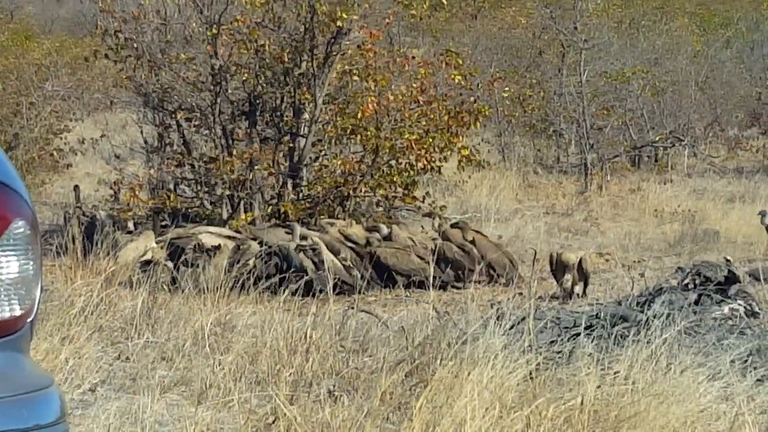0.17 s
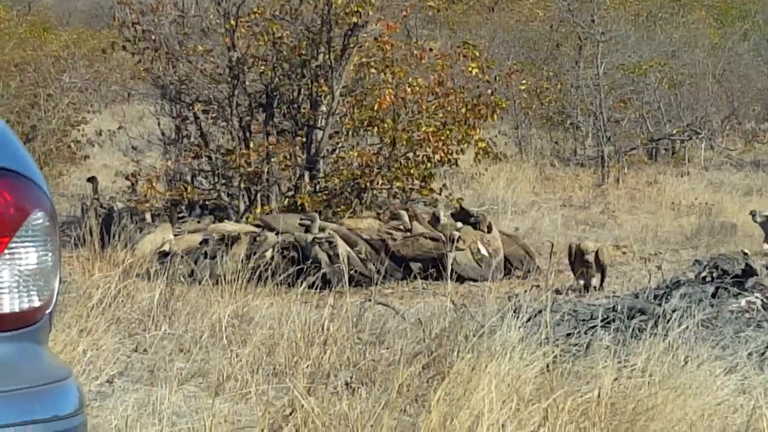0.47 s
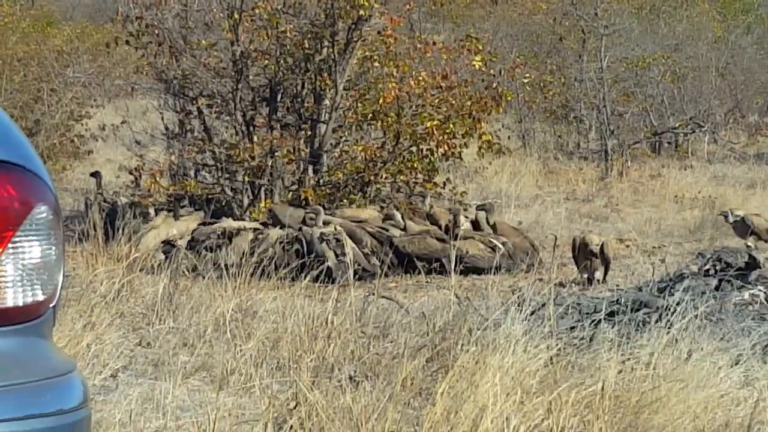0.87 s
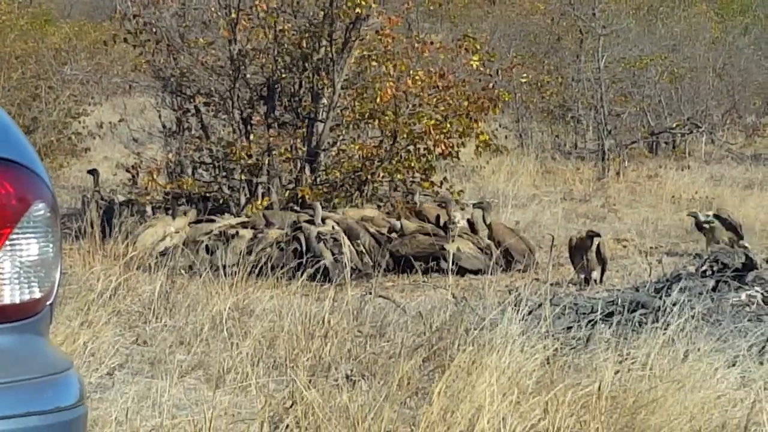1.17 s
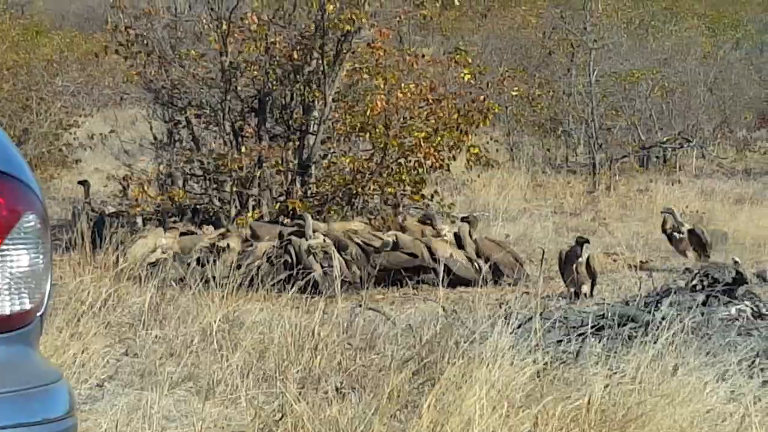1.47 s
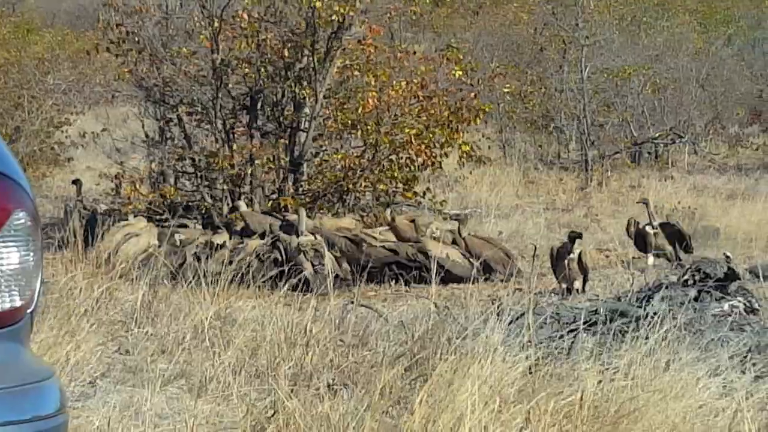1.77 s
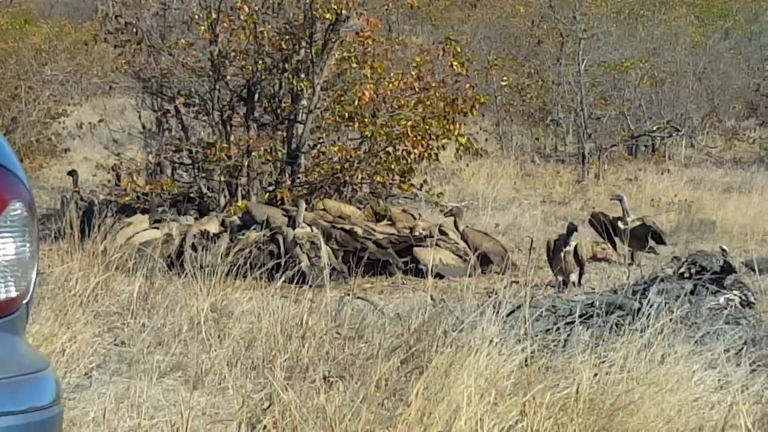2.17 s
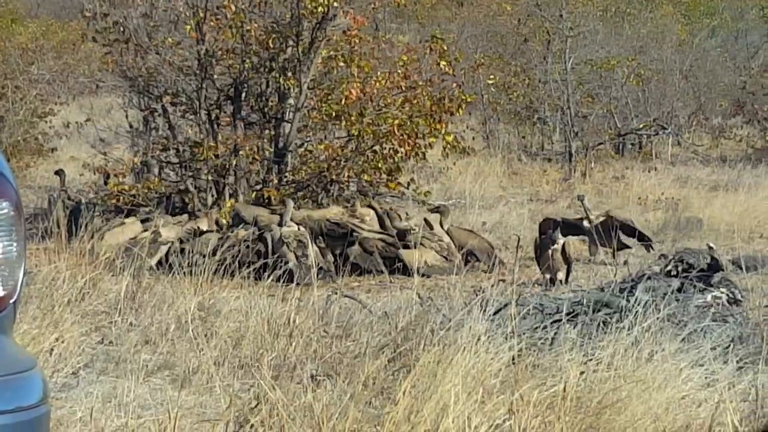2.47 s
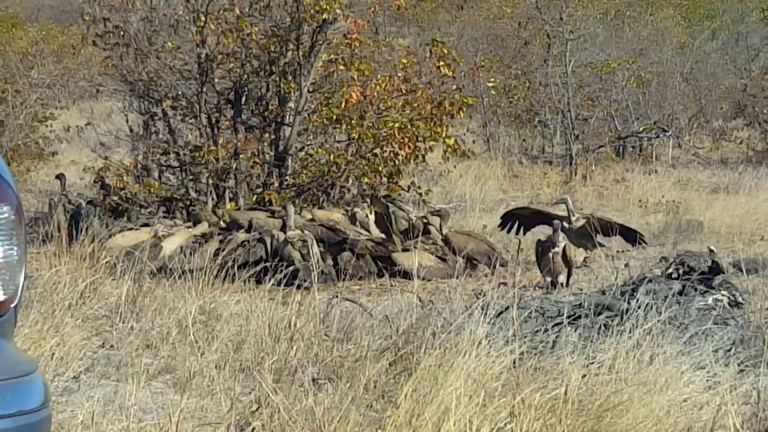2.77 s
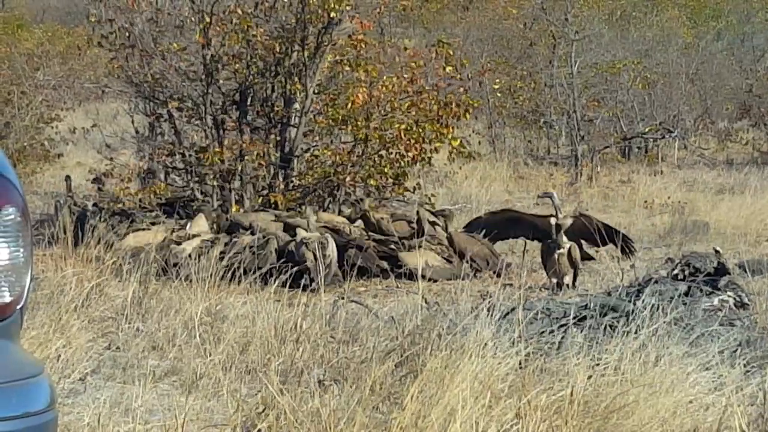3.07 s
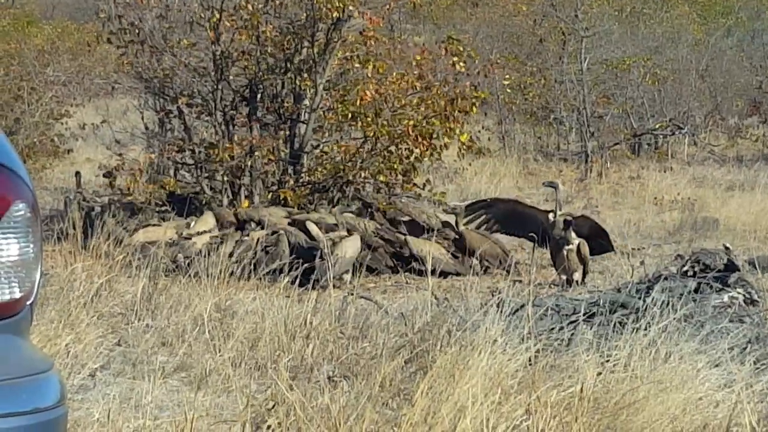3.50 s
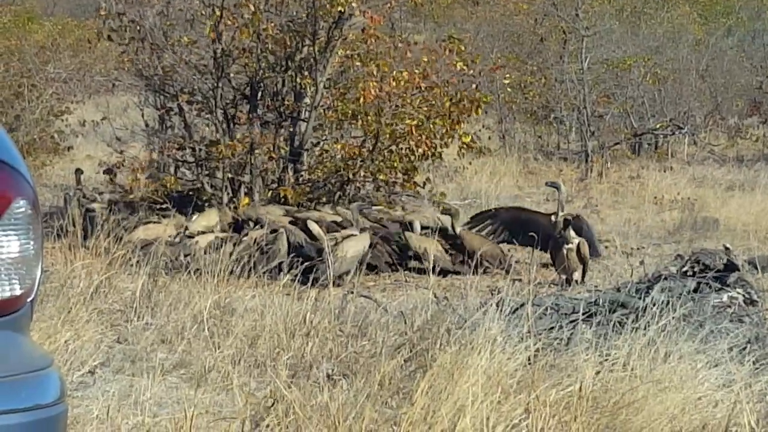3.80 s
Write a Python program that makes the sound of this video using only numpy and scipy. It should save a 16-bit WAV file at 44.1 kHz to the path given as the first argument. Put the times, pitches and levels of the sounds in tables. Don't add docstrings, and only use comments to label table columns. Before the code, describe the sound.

Vultures hiss, rasp and squabble over a carcass while low wind rumble buffets the microphone.

```python
import sys
import numpy as np
from scipy import signal
from scipy.fft import rfft, irfft, next_fast_len
from scipy.io import wavfile

SR = 44100
rng = np.random.default_rng(int(sys.argv[2]) if len(sys.argv) > 2 else 0)


def nominal_scale(level):
    x = np.asarray(level, float) / 20
    return 10 ** x


def to_wav(s):
    ch = np.atleast_2d(s).T
    pcm = np.round(np.clip(ch, -1, 1) * 32767)
    wavfile.write(sys.argv[1], SR, pcm.astype(np.int16))


N = 173754
TIME = np.arange(N) / SR
LONG = next_fast_len(N)

# pitch_hz, level_db
BREATH_COLOUR = [(2000, -3.5), (3000, -3.5), (4100, 0), (5200, -6.5), (6500, -14.5), (8000, -25),
                 (10000, -40), (14000, -26)]
# start_s, length_s, level_db
HISSER_THROAT = [(3570, 110, -3), (3760, 120, -7), (3910, 40, -2), (5850, 230, -3.5)]
HISSER_CALLS = [
    (.02, 0.21, -58.5),
    (.12, 0.31, -48),
    (.27, 0.33, -53),
]
RASPER_THROAT = [(2450, 260, -7), (3020, 100, -6), (4170, 110, -1), (4620, 200, -1), (5150, 220, -4),
                 (6050, 200, -19), (6650, 160, -18)]
RASPER_CALLS = [
    (0.543, 0.049, -48),
    (.59, 0.072, -57),
    (0.627, 0.14, -45),
    (0.709, 0.13, -45),
    (0.809, 0.078, -44),
    (0.871, 0.094, -44),
    (.94, 0.13, -48),
    (1.04, .13, -54.5),
]
SQUABBLER_THROAT = [(3050, 120, -6), (4050, 80, -1), (4840, 150, -2), (5750, 110, -8)]
SQUABBLER_CALLS = [
    (2.38, 0.091, -59.5),
    (2.47, 0.21, -60.5),
    (2.58, 0.23, -57),
    (2.76, 0.19, -55.5),
    (3.0, 0.15, -61.5),
    (3.085, 0.062, -53.5),
    (3.19, 0.066, -54.5),
    (3.25, 0.073, -58.5),
]
CROAKER_THROAT = [(3150, 70, -10), (3400, 80, -5), (4130, 60, 0), (4920, 70, -12), (5420, 100, -9)]
CROAKER_CALLS = [
    (3.673, .03, -62),
    (3.748, .04, -60),
    (3.775, .2, -56),
]
# pitch_hz, level_db
SPIT_COLOUR = [(2500, -23), (5000, 7), (8000, -7.5), (10500, -18.5), (12000, -4), (14000, -0.5),
               (16000, -6)]
# start_s, length_s, level_db
SPITS = [
    (0, .19, -62),
    (.15, 0.25, -57),
    (.3, 0.283, -59),
    (.712, 0.027, -59.5),
    (.735, 0.043, -67),
    (.87, 0.039, -65),
    (.76, 0.7, -71.5),
]
# time_s, level_db
CROWD_LEVEL = [(0, -58), (.6, -55), (1.2, -56), (1.7, -58.5), (2.3, -58.5), (2.6, -59.5), (3.25, -55),
               (3.55, -59), (3.94, -57)]
# start_s, length_s, pitch_hz, glide_hz, level_db
SQUEAKS = [(.553, 0.025, 4100, 62, -43), (.72, .025, 4160, -41, -45), (.74, 0.057, 3010, -59, -46.5),
           (.808, .035, 2980, 40, -48.5), (0.811, .035, 4650, -6, -44), (.82, 0.018, 5300, 0, -55),
           (.9, 0.029, 4250, 0, -48), (2.4, 0.09, 4900, 0, -63), (2.42, 0.018, 4350, -2, -64),
           (2.845, 0.058, 2890, -2, -56), (3.03, 0.026, 4180, -200, -62), (3.088, .018, 4030, 40, -49.5),
           (3.113, 0.012, 3600, 0, -56), (3.118, 0.016, 4030, 200, -55), (3.138, 0.009, 5400, 0, -61),
           (3.19, 0.045, 4020, 100, -56), (3.219, 0.013, 5620, 100, -56), (3.22, .01, 5200, -4, -61),
           (3.229, .012, 4110, 0, -54), (3.322, 0.014, 4050, 0, -56), (3.35, .022, 4100, 0, -56.5),
           (3.676, 0.028, 4060, 148, -51.5), (3.684, .022, 3160, -150, -52), (3.753, 0.022, 4100, -42, -50),
           (3.796, 0.011, 4140, 0, -52), (3.873, 0.012, 4050, -58, -59), (3.81, .025, 5450, 0, -68)]
# time_s, pitch_hz, level_db
SQUEAL = [
    (2.605, 5080, -63),
    (2.645, 4800, -59),
    (2.675, 4740, -59),
    (2.725, 4420, -56),
    (2.815, 4380, -54),
    (2.84, 4170, -61),
    (2.895, 4100, -54),
    (2.925, 3920, -55.5),
    (2.947, 3790, -59),
]
# time_s, level_db, pitch_hz
SNAPS = [(.208, -61, 8700), (1.262, -69, 8000), (1.44, -50.5, 3800), (1.441, -65, 7200), (2.565, -55, 4500),
         (2.589, -53, 4100), (2.72, -65, 6500), (2.966, -66, 7000), (3.197, -49, 2500),
         (3.581, -44.5, 4350), (3.581, -66, 7400), (3.727, -60, 5400), (3.768, -63.5, 7200)]
# time_s, length_s, roar_db, edge_lift_hz
GUSTS = [(0.024, 0.088, -70, 207), (0.429, 0.045, -59, 970), (0.897, 0.089, -64.5, 248),
         (1.187, 0.046, -59.5, 910.4), (1.33, 0.12, -68, 403), (1.835, 0.064, -81, 700),
         (1.88, 0.034, -56, 950), (2.26, 0.25, -74.5, 242), (2.614, 0.053, -70, 600),
         (2.683, 0.039, -70, 330), (3.09, 0.22, -70, 278), (3.365, 0.06, -66, 850),
         (3.602, 0.036, -92, 248)]
# time_s, drone_db, left_buffet_db, right_buffet_db
PUFFS = [(0.15, -47.5, -56, -63), (0.22, -51, -62, -67), (0.32, -49.5, -59, -55), (0.46, -44.5, -48.5, -52),
         (0.55, -72, -72, -81), (0.78, -43, -53.5, -55), (0.89, -49, -60, -62), (0.98, -50.5, -55.5, -54),
         (1.08, -45.5, -59, -51), (1.19, -38.5, -45.5, -39), (1.47, -47.5, -52.5, -54),
         (1.59, -48, -55.5, -54.5), (1.82, -44.5, -47, -47.5), (2.1, -43, -51, -50),
         (2.35, -49.5, -53, -51), (2.45, -45, -58, -63), (2.6, -42.5, -45.5, -48), (2.73, -48.5, -54, -57),
         (2.91, -43, -54, -57), (3.04, -47.5, -51.5, -54), (3.16, -46.5, -56, -48.5),
         (3.24, -48.5, -57, -54.5), (3.35, -47, -46, -46.5), (3.59, -50.5, -59, -57), (3.69, -48, -52, -49),
         (3.85, -46.5, -51, -57)]
EXTRA_PUFFS = [(.06, -61, -50, -71), (.39, -46, -51, -63), (1.26, -46.5, -65, -47.5),
               (1.358, -44.5, -50.5, -57), (1.668, -52, -56, -52.5), (1.9, -43.5, -49, -57),
               (2.27, -45, -58, -51.5), (3.43, -46.5, -54, -58)]
# time_s, pitch_hz
DRONE_PITCH = [(0, 66.28), (.9, 65.7), (1.9, 64.1), (2.9, 65.1), (3.94, 66.1)]
# pitch_multiple, level_db
OVERTONES = [(2, -18), (3.5, -22)]
# pitch_hz, level_db
BUFFET_LEFT = [(20, -8), (45, -3.5), (90, -6), (140, -2), (250, -14), (500, -23), (1500, -48.5)]
BUFFET_RIGHT = [(20, -13.5), (90, 3.5), (140, -3.5), (250, -15), (500, -38.5), (1500, -56)]
ROAR_COLOUR = [(100, 1), (600, -7), (3000, -31.5)]
# pitch_hz, level_db
HISS_LEFT = [(200, 2.5), (900, -11), (2000, -13.5), (5000, -20), (10000, -30), (11200, -28), (13000, -21),
             (16000, -27)]
HISS_RIGHT = [(200, 0.5), (900, -10.5), (2000, -11.5), (5000, -24), (9500, -23), (11200, -23.5),
              (13000, -19), (16000, -16.5)]
HISS_DB = [-63.5, -68]


def evened(x):
    return x / np.sqrt(np.mean(x ** 2) + 1e-20)


def noise(colour):
    table_hz, table_db = np.transpose(colour)
    hz = np.fft.rfftfreq(LONG, 1 / SR)
    gain = nominal_scale(np.interp(np.log(hz + 1), np.log(table_hz), table_db))
    gain = gain * np.minimum(table_hz[-1] / (hz + 1), 1) ** 2
    return evened(irfft(rfft(rng.standard_normal(LONG)) * gain, LONG)[:N])


def wander(rate_hz):
    t = TIME[::32]
    hz = np.fft.rfftfreq(len(t), t[1])
    gain = hz / (hz + 3) / (1 + (hz / rate_hz) ** 4)
    drift = irfft(rfft(rng.standard_normal(len(t))) * gain, len(t))
    return np.interp(TIME, t, evened(drift))


def resonate(x, hz, width_hz):
    turn = np.exp(2j * np.pi * np.cumsum(hz * np.ones(N)) / SR)
    r = np.exp(-np.pi * abs(width_hz) / SR)
    return 2 * (turn * signal.lfilter([(1 - r) ** 2], [1, -2 * r, r * r], x / turn)).real


def bumps(at, width_s, height):
    t = TIME[::64]
    distance = (t - at[:, None]) / np.reshape(width_s, (-1, 1))
    swells = np.asarray(height)[:, None] * np.exp(-.5 * distance ** 2)
    return np.interp(TIME, t, swells.sum(0))


def efforts(calls, release_share):
    power = np.zeros(N)
    for start, length, db in calls:
        rise = np.clip((TIME - start) / (.15 * length), 0, 1)
        end = start + length * (1 + release_share / 2)
        fall = np.clip((end - TIME) / (release_share * length), 0, 1)
        power += (nominal_scale(db) * rise * fall) ** 2
    return np.sqrt(power)


def vulture(throat, calls, open_db, flutter_db, flutter_hz, widen):
    breath = rng.standard_normal(N) * nominal_scale(flutter_db * wander(flutter_hz))
    rings = np.zeros(N)
    for hz, width_hz, db in throat:
        moving_hz = hz * (1 + .007 * wander(9))
        rings += nominal_scale(db + 1.2 * wander(25)) * evened(resonate(breath, moving_hz, widen * width_hz))
    escaping = nominal_scale(open_db) * noise(BREATH_COLOUR) * nominal_scale(0.88 * wander(40))
    return efforts(calls, .6) * evened(evened(rings) + escaping)


def near_birds():
    return (vulture(HISSER_THROAT, HISSER_CALLS, open_db=8.5, flutter_db=3.5, flutter_hz=78.6, widen=3.4)
            + vulture(RASPER_THROAT, RASPER_CALLS, open_db=-1, flutter_db=1.2, flutter_hz=150, widen=1.3)
            + vulture(SQUABBLER_THROAT, SQUABBLER_CALLS, open_db=4, flutter_db=-2.0, flutter_hz=91, widen=2.0)
            + vulture(CROAKER_THROAT, CROAKER_CALLS, open_db=-7, flutter_db=1.6, flutter_hz=70, widen=1.3))


def spits():
    return efforts(SPITS, .12) * noise(SPIT_COLOUR) * nominal_scale(1.4 * wander(28))


def squeaks():
    width_hz, hoarse = 120, .65
    r = np.exp(-np.pi * width_hz / SR)
    grit = rng.standard_normal(N) + 1j * rng.standard_normal(N)
    grit = signal.lfilter([1], [1, -2 * r, r * r], grit)
    grit = grit / np.sqrt(np.mean(abs(grit) ** 2))
    out = np.zeros(N)
    for start, length, hz, glide_hz, db in SQUEAKS:
        at = slice(round(start * SR), round((start + length) * SR))
        progress = (TIME[at] - start) / length
        turn = np.exp(2j * np.pi * np.cumsum(hz + glide_hz * (progress - .5)) / SR)
        swell = np.sqrt(np.sin(np.pi * np.clip(progress, 0, 1)))
        voice = (turn * (1 - hoarse + hoarse * grit[at])).real
        out[at] += np.sqrt(2) * nominal_scale(db) * swell * voice
    return out


def squeal():
    t, hz, db = np.transpose(SQUEAL)
    gate = np.clip(np.minimum(TIME - t[0], t[-1] - TIME) / 0.011, 0, 1)
    level = nominal_scale(np.interp(TIME, t, db) + 1.0 * wander(30))
    pitch_hz = np.interp(TIME, t, hz) + 12 * wander(88)
    return np.sqrt(2) * gate * level * np.sin(2 * np.pi * np.cumsum(pitch_hz) / SR)


def beak_snaps():
    fade_s = .032
    grit, white = noise(BREATH_COLOUR), rng.standard_normal(N)
    out = np.zeros(N)
    for start, db, hz in SNAPS:
        at = slice(round(start * SR), round((start + fade_s) * SR))
        age = np.maximum(TIME[at] - start, 0)
        band = signal.butter(3, [hz * .89, hz * 1.11], "bandpass", fs=SR, output="sos")
        ring = evened(signal.sosfilt(band, white[at]))
        tick = nominal_scale(-60 * age / fade_s) * np.minimum(age / .001, 1) * (ring + .25 * grit[at])
        out[at] += nominal_scale(db + 6) * tick / abs(tick).max()
    return out


def crowd():
    wash = noise(BREATH_COLOUR) + nominal_scale(-13.5) * evened(resonate(rng.standard_normal(N), 4110, 470))
    level_db = np.interp(TIME, *np.transpose(CROWD_LEVEL))
    return wash * nominal_scale(level_db + 1.0 * wander(10.2) + 0.46 * wander(85))


def wind_filter(x):
    rest_hz, lag_s, softness_hz, leak_db = 2680, .05, 30, -19
    at, length, _, lift_hz = np.transpose(GUSTS)
    keep = np.exp(-1 / (lag_s * SR))
    edge_hz = rest_hz + signal.lfilter([1 - keep], [1, -keep], bumps(at + 0.027, length, lift_hz))
    hz, t, z = signal.stft(x, SR, nperseg=1024, noverlap=896)
    hz = hz[:, None]
    step = .5 + .5 * np.tanh((hz - np.interp(t, TIME, edge_hz)) / softness_hz)
    leak = nominal_scale(leak_db) * np.minimum(hz / rest_hz, 1) ** 3
    return signal.istft(z * (leak + (1 - leak) * step), SR, nperseg=1024, noverlap=896)[1][:N]


def wind():
    at, *puff_db = np.transpose(sorted(list(PUFFS) + list(EXTRA_PUFFS)))
    lull_db = (-51.5, -59, -58.5)
    drone, left, right = [np.sqrt(nominal_scale(lull) ** 2 + bumps(at, 0.027, nominal_scale(db + 0.5) ** 2))
                          for db, lull in zip(puff_db, lull_db)]
    pitch_hz = np.interp(TIME, *np.transpose(DRONE_PITCH)) + 0.64 * wander(19.0)
    turn = 2 * np.pi * np.cumsum(pitch_hz) / SR
    tone = np.sin(turn)
    for multiple, db in OVERTONES:
        tone += nominal_scale(db + 3.7 * wander(6.0)) * np.sin(multiple * turn + 0.48 * wander(35.0))
    at, length, roar_db, _ = np.transpose(GUSTS)
    roar = np.sqrt(bumps(at, length, nominal_scale(roar_db) ** 2)) * nominal_scale(2. * wander(40))
    left_buffet = left * nominal_scale(3.07 * wander(38)) * noise(BUFFET_LEFT)
    right_buffet = right * nominal_scale(0.58 * wander(22)) * noise(BUFFET_RIGHT)
    return np.array([np.sqrt(2) * drone * tone + left_buffet + roar * noise(ROAR_COLOUR),
                     right_buffet + nominal_scale(-9) * roar * noise(ROAR_COLOUR)])


def circuit_noise():
    hiss = nominal_scale(np.c_[HISS_DB]) * np.array([noise(HISS_LEFT), noise(HISS_RIGHT)])
    whine = nominal_scale(-87) * evened(resonate(rng.standard_normal(N), 11400 - 8 * TIME, 130))
    return hiss + np.array([whine, np.zeros(N)])


def scene():
    birds = near_birds() + spits() + squeaks() + squeal() + beak_snaps() + crowd()
    return np.array([wind_filter(birds), np.zeros(N)]) + wind() + circuit_noise()


def low_pass(x):
    return signal.sosfilt(signal.butter(12, 16180, fs=SR, output="sos"), x)


def record(dry):
    kept = rfft(dry, LONG) * (np.fft.rfftfreq(LONG, 1 / SR) < 15740)
    mix = irfft(kept, LONG)[:, :N] - .0006
    return low_pass(mix)


dry = scene()
out = record(dry)
to_wav(out)
```